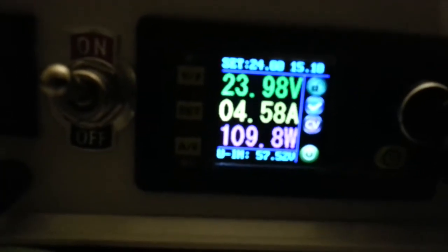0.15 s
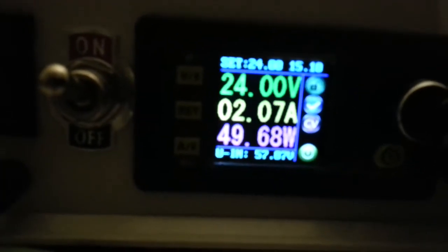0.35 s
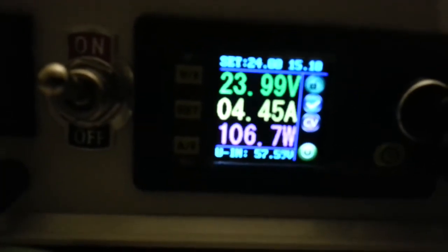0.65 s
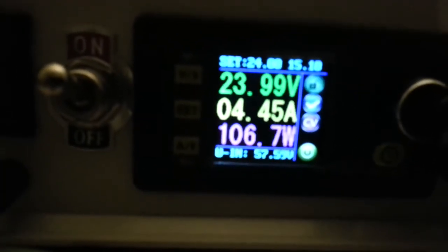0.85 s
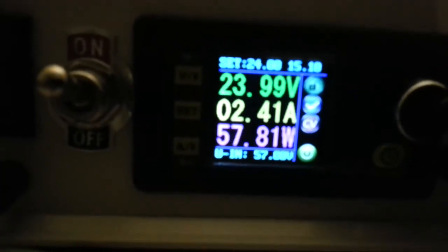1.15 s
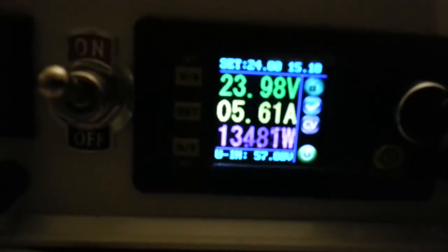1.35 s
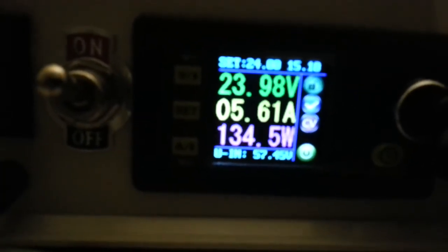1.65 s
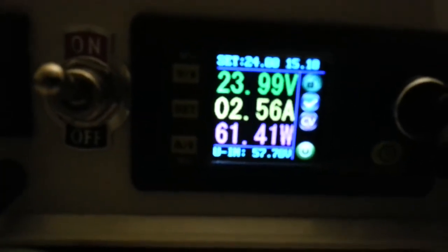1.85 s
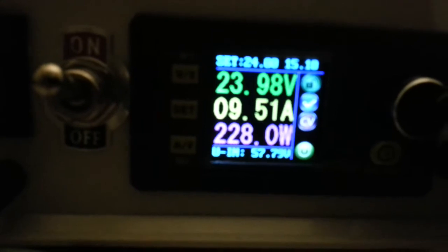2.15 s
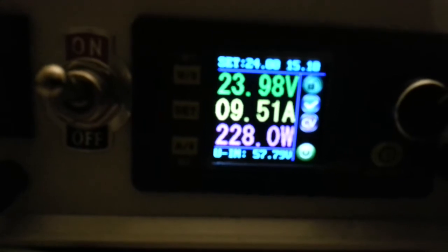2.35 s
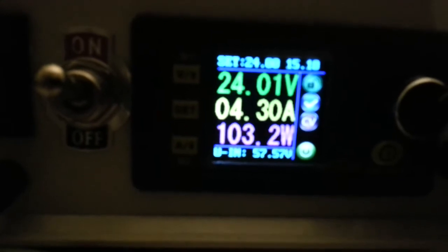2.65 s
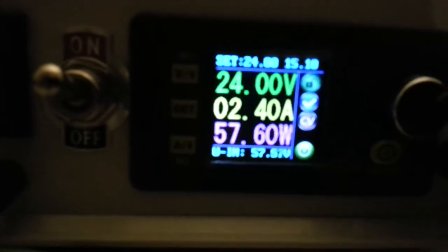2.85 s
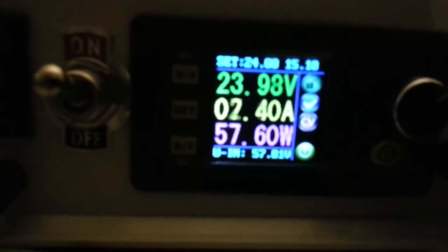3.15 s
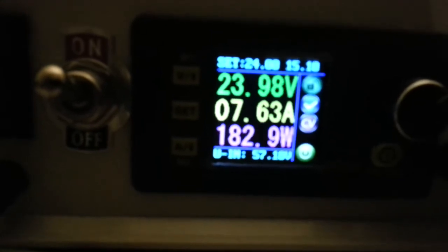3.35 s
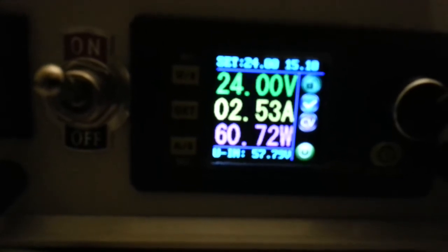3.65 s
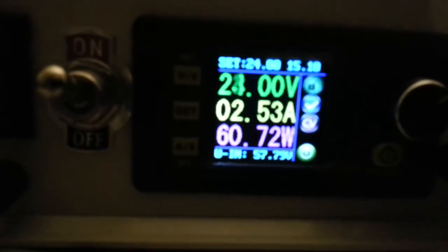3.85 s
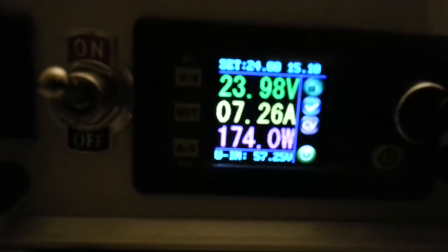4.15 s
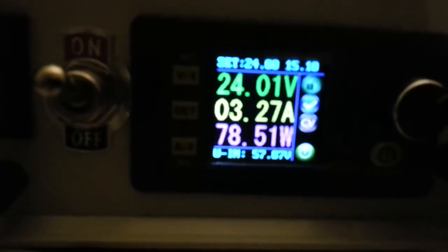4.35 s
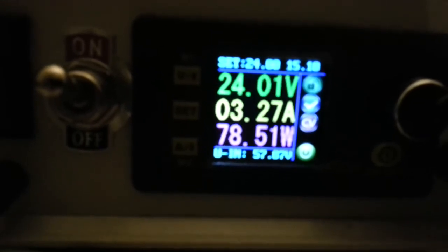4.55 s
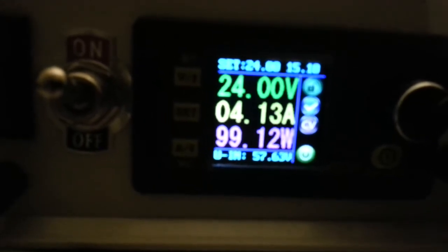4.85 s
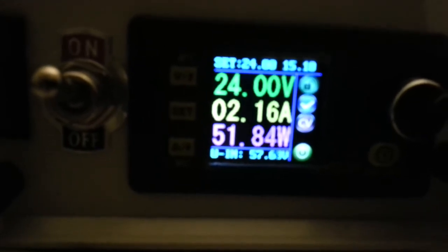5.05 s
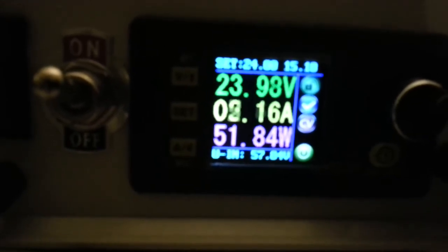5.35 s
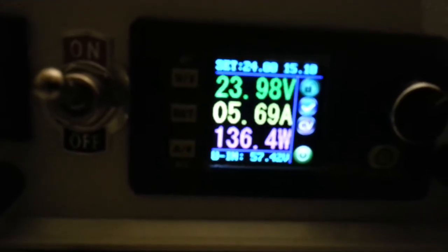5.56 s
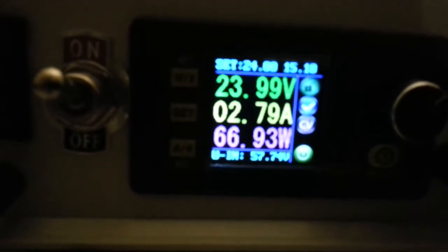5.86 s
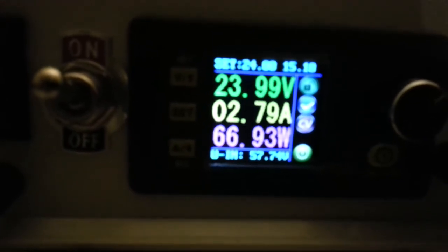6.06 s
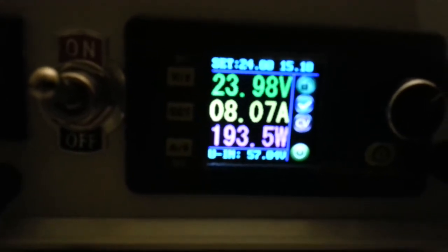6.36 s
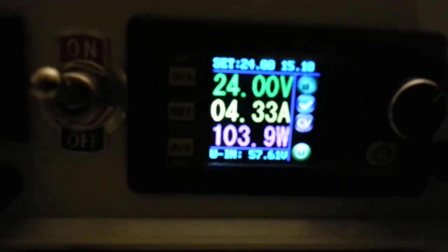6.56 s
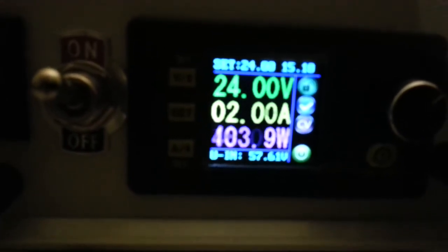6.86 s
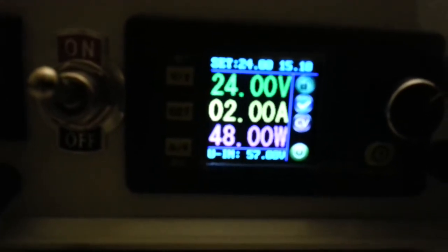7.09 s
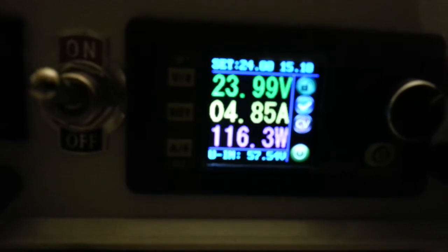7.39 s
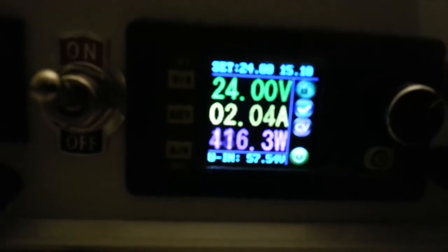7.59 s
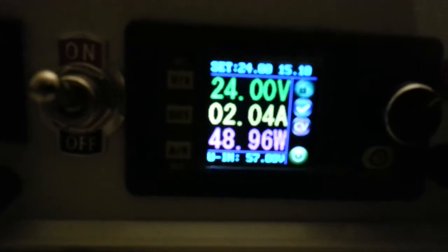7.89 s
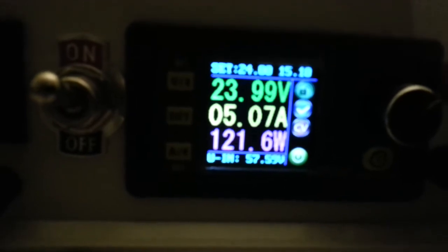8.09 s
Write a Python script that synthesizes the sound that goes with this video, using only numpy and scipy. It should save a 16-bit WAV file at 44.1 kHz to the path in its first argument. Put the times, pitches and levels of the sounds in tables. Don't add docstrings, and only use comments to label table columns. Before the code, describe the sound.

A small electric arc hisses and fizzes, snapping and restriking with sharp loud pops and brief high squeals over a faint fan in a small room.

```python
import sys
import numpy as np
from scipy import signal
from scipy.fft import rfft, irfft, next_fast_len
from scipy.io import wavfile
from scipy.ndimage import uniform_filter1d

SR = 44100
rng = np.random.default_rng(int(sys.argv[2]) if len(sys.argv) > 2 else 0)


def undo_db(level):
    steps = np.asarray(level, float) / 20
    return 10 ** steps


def output_pcm(signal):
    pcm = np.clip(np.atleast_2d(signal).T, -1, 1) * 32767
    wavfile.write(sys.argv[1], SR, np.round(pcm).astype(np.int16))


N = 362797

IDLE_DB = -68
LOW_HZ = 289

# (restrike time [s], roar length [ms], roar level [dB], sweep level [dB], thud peak [dB])
TEAR_EVENTS = [(0.127, 9, -16.5, -15.5, -5), (0.7971, 8.4, -14.5, -21, -6.5),
               (1.496, 7.2, -15.5, -19.5, -4), (2.0164, 12.5, -17, -16, -6.5),
               (2.5115, 11.4, -12.5, -17, -14.5), (2.6337, 15.8, -18, -17, -6.5),
               (3.3712, 29.7, -20, -16.5, -5), (4.184, 33.5, -21, -19, -5.5), (4.8629, 8.1, -14.5, -21, -7),
               (5.5008, 16.8, -23, -15.5, -5), (6.0721, 18, -14.5, -47, -7.5),
               (6.7449, 9.2, -20, -17.5, -2), (7.486, 4.2, -17.5, -20.5, -8.5),
               (8.096, 4.7, -24, -13.5, -7.5)]


def colour(x, table):
    size = next_fast_len(x.shape[-1])
    hz, db = np.transpose(table)
    f = np.arange(size // 2 + 1) * SR / size
    gain = undo_db(np.interp(np.log(f + 1), np.log(hz + 1), db))
    return irfft(rfft(x, size) * gain, size)[..., :x.shape[-1]]


def unit(x):
    return x / np.sqrt(np.mean(x ** 2))


def walk(rate, count=N):
    hold = max(int(SR / rate), 1)
    steps = np.repeat(rng.standard_normal(N // hold + 1), hold)
    return uniform_filter1d(uniform_filter1d(steps, hold), hold)[:count]


def band(x, hz, order=2):
    edges = [hz / 2.89, min(hz * 1.98, SR / 2.2)]
    return signal.sosfilt(signal.butter(order, edges, "band", fs=SR, output="sos"), x)


def highpass(x, hz, order=2):
    return signal.sosfilt(signal.butter(order, hz, "high", fs=SR, output="sos"), x)


def ring(modes):
    t = np.arange(SR // 40) / SR
    return -sum(undo_db(db) * np.sin(2 * np.pi * hz * t) * 1000. ** (-t / t60) for hz, db, t60 in modes)


def strikes(s, db, shape):
    train = np.zeros(N)
    train[(s * SR).astype(int)] = undo_db(db)
    return signal.oaconvolve(train, shape / np.abs(shape).max())[:N]


def hiss_db(t):
    # (start [s], end [s], start level [dB], end level [dB])
    stretches = [(0, 0.354, -57.5, -53.5), (0.379, 0.526, -45.5, -38.5), (0.527, 0.749, -45.5, -38.5),
                 (1.615, 1.74, -58.5, -47), (1.735, 1.99, -51, -43.5), (2.1, 2.342, -56, -40.5),
                 (2.366, 2.517, -33.5, -25.5), (2.522, 2.621, -33.5, -22), (2.67, 2.84, -38.5, -33),
                 (2.838, 3.091, -33.5, -29.5), (3.113, 3.229, -25.5, -30.5), (3.249, 3.31, -31.5, -23),
                 (3.398, 3.574, -39.5, -34.5), (3.57, 3.63, -32.5, -36), (3.68, 3.776, -54, -44),
                 (3.778, 3.96, -43.5, -51), (3.965, 4.03, -49, -40.5), (4.2, 4.604, -40, -36.5),
                 (4.595, 4.69, -32, -55), (4.714, 4.85, -45, -57), (5.017, 5.753, -49, -56.5),
                 (5.109, 5.106, -40, -37), (5.76, 5.853, -43.5, -43.5), (5.86, 5.96, -48.5, -56.5),
                 (5.98, 6.061, -42, -41), (6.15, 6.237, -44, -53), (6.444, 6.649, -58, -44),
                 (7.356, 7.463, -56, -56), (7.68, 7.895, -61.5, -49), (7.893, 8.042, -51.5, -48)]
    light_db_per_s, quench_db_per_s = 800, 1100
    each = []
    for start, end, start_db, end_db in stretches:
        drift = np.interp(t, [start, end], [start_db, end_db])
        unlit = light_db_per_s * np.maximum(start - t, 0)
        quenched = quench_db_per_s * np.maximum(t - end, 0)
        each.append(drift - unlit - quenched)
    return np.maximum(np.max(each, axis=0), IDLE_DB)


def fan():
    # (frequency [Hz], level [dB])
    air_colour = [(15, -60), (25, -50), (106, -18), (154, -15), (186, -7.5), (271, -12), (501, -15),
                  (691, -12.5), (856, -14), (1180, -19.5), (1670, -17), (1910, -18.5), (15000, -27)]
    # (frequency [Hz], level [dB])
    hum_lines = [(188.4, -62.5)]
    air_db, load_db = -52, 2
    t = np.arange(N) / SR
    flutter_db = 1.5 * walk(8)
    alike = colour(rng.standard_normal(N), [(150, -12.5), (500, -14), (1500, -19)])
    air = unit(colour(3.65 * alike + rng.standard_normal((2, N)), air_colour)) * undo_db(air_db + flutter_db)
    load = uniform_filter1d(np.clip((hiss_db(t) - IDLE_DB) / 14, 0, 1), size=4000)
    hum = sum(undo_db(db + 6 + 1.1 * walk(2.0)) * np.sin(2 * np.pi * hz * t + 1.0 * walk(4.3))
              for hz, db in hum_lines)
    return air * undo_db(load_db * load) + hum


def rumble():
    swell = np.interp(np.arange(N) / SR, [8.02, 8.16], [0, 1])
    dull = colour(rng.standard_normal(N), [(130, -13), (230, 2), (300, -1), (480, -10), (1000, -41.5)])
    return unit(dull) * swell * undo_db(-45.5 + 2.9 * walk(40))


def knocks():
    # (time [s], peak level [dB])
    taps = [(1.119, -31), (1.754, -25.5), (2.302, -23.5), (4.8123, -24), (5.7985, -32), (6.367, -29.5),
            (7.0732, -31), (7.34, -23.5), (7.3866, -20), (7.869, -31), (8.008, -29)]
    # (frequency [Hz], level [dB], time to fade by 60 dB [s])
    wood_modes = [(436, -5, 0.04), (786, 15, 0.011), (1530, 16, 0.0024)]
    s, db = np.transpose(taps)
    return strikes(s, db - 7.5, np.convolve(ring(wood_modes), np.hanning(15)))


def sparks(scatter_db, flicker_db, rate):
    size = np.minimum(rng.exponential(size=N), 5)
    discharges = np.clip(rng.standard_normal(N), -3, 3) * undo_db(scatter_db * size)
    return discharges * undo_db(flicker_db * walk(rate))


def hiss():
    # (time [s], depth [dB])
    sputter = [(0, 2), (2.3, 1.5), (3.6, 1.5), (3.8, 3), (4.35, 4), (4.42, 7), (4.72, 8), (4.8, 2),
               (5.0, 4), (5.9, 4), (6.6, 3), (8.2, 2)]
    # (frequency [Hz], level [dB])
    resonances = [(3800, -25.5), (4900, 0), (6000, 1.5), (7600, 7)]
    treble_db, treble_per_db = -12, -0.11
    t = np.arange(N) / SR
    db = hiss_db(t)
    depth_db = np.interp(t, *np.transpose(sputter))
    spurts = undo_db(depth_db * (np.tanh(3 * walk(90)) - .5))
    fizz = sparks(2.5, 2.2, 400) * spurts
    body = np.zeros(N)
    for hz, gain_db in resonances:
        hump = [(hz * 0.22, -60), (hz * 0.81, 0), (hz * 1.036, 0), (hz * 1.22, -30)]
        body += colour(fizz, hump) * undo_db(gain_db + 4.16 * walk(9.3))
    treble = unit(colour(fizz, [(6500, -30), (9500, 14), (11500, 8.5), (14000, 1.5)])) * undo_db(4 * walk(14))
    return undo_db(db + 2.0) * (unit(body) + undo_db(treble_db + treble_per_db * (db + 44.5)) * treble)


def squeal():
    # (start [s], end [s], pitch [Hz], start level [dB], end level [dB])
    runs = [
        (0.067, 0.107, 6400, -61, -39),
        (1.963, 1.987, 6030, -47, -37),
        (3.249, 3.32, 6155, -44.5, -16.5),
        (4.03, 4.143, 6065, -22, -24),
        (7.367, 7.445, 6930, -63, -52),
    ]
    # (time [s], pitch [Hz], peak level [dB], swell [ms])
    chirps = [(.049, 6420, -26, 0.62), (0.066, 6210, -16, 1), (0.1165, 6120, -3.5, 4), (.12, 6550, 4, 0.35),
              (0.735, 6350, -5, 2.75), (0.745, 6340, -1.5, 2.2), (.749, 6240, -12.5, 3.1),
              (0.7536, 6450, -7, 1.4), (0.754, 6440, -5, 1.4), (0.762, 6480, -14.5, 2.5),
              (0.7772, 6425, -1, 5.6), (.7852, 6280, -3.5, 5.7), (0.7894, 6630, -12, .8),
              (.7954, 6980, -3, 1.4), (1.491, 6390, -13.5, 2), (1.9539, 5860, -5, 1.7),
              (1.9959, 6040, -3, 0.9), (1.9984, 6010, -4.5, 1.3), (4.154, 5810, -4.5, 1.67),
              (4.1594, 5920, -15.5, 2.5), (4.1627, 6290, -4, 1.76), (4.8566, 6600, -12, 2.1),
              (6.061, 6470, -5, 2.2), (6.0682, 6450, -7, 2.4), (6.702, 6300, -20, 1.92),
              (6.736, 6330, -6, 1.6), (6.7412, 6270, -2, 0.76), (7.4804, 6380, -8.5, .9)]
    hz_now, size = np.full(N, 6200.), np.zeros(N)
    waver, stutter = walk(900), walk(420)
    for start, end, hz, start_db, end_db in runs:
        i = np.arange(int(start * SR), int(end * SR))
        hz_now[i] = hz * (1 + 0.0493 * waver[i])
        level = undo_db(np.interp(i / SR, [start, end], [start_db, end_db]) + 7.5)
        size[i] = level * np.abs(1 + 0.27 * stutter[i])
    for s, hz, db, swell_ms in chirps:
        fade_ms = .75 * swell_ms
        ms = np.arange(-6 * swell_ms, 4 * fade_ms, 1000 / SR)
        i = int(s * SR + ms[0] * SR / 1000) + np.arange(len(ms))
        away = np.abs(ms / np.where(ms < 0, swell_ms, fade_ms))
        blob = undo_db(db - 8.0 - 4.75 * away ** np.where(ms < 0, 1.2, 1.8))
        hz_now[i] = np.where(blob > size[i], hz * (1 + 0.018 * waver[i]), hz_now[i])
        size[i] = np.maximum(size[i], blob)
    phase = 2 * np.pi * np.cumsum(hz_now) / SR
    return uniform_filter1d(size, size=9) * (np.sin(phase) + undo_db(-29.0) * np.sin(2 * phase))


def tears():
    # (end time [s], roar length [ms], roar level [dB], sweep level [dB])
    flares = [
        (0.7815, 12, -16.5, -60),
        (.7893, 6.8, -20, -30),
        (2.0052, 6.8, -13, -41),
        (3.135, 26, -36, -50),
        (3.321, 24, -21, -50),
        (3.3401, 22, -18.5, -28),
        (4.1255, 99, -18, -50),
    ]
    # (frequency [Hz], level [dB])
    roar_colour = [(320, -26), (550, -14), (1810, -10), (2350, -7), (5100, -1), (5780, -14.5), (6910, 2.5),
                   (9240, -1.5), (12400, -5), (15000, -3.5)]
    rise_ms, sweep_hz = .7, 8400
    out, waver = np.zeros(N), walk(1500)
    roar = unit(colour(sparks(2.88, 5.3, 600), roar_colour))
    for end, length_ms, db, sweep_db, *_ in TEAR_EVENTS + flares:
        s = end - length_ms / 1000
        i = np.arange(int(s * SR - 8 * rise_ms * SR / 1000), int(end * SR))
        ms = (i / SR - s) * 1000
        gone = np.clip(ms / length_ms, 0, 1) ** 0.91
        up_hz = (sweep_hz + (14000 - sweep_hz) * gone) * (1 + 0.09 * waver[i])
        down_hz = (6200 - 2800 * gone) * (1 + 0.2 * waver[i])
        climbing = np.sin(2 * np.pi * np.cumsum(up_hz) / SR)
        sinking = 0.67 * np.sin(2 * np.pi * np.cumsum(down_hz) / SR)
        swell = np.exp(np.minimum(ms / rise_ms, 0))
        out[i] += swell * (undo_db(db) * roar[i] + undo_db(sweep_db) * (climbing + sinking))
    return out


def pops():
    # (time [s], thud peak [dB], crack peak [dB])
    snaps = [(.654, -13, 4.5), (0.7328, -22, 2.5), (.743, -25, 5.5), (0.7723, -21, -6), (1.4207, -14, 2.5),
             (1.9541, -18.5, 4), (2.5932, -24.5, 5), (2.9465, -52, -34), (3.1354, -20.5, 8),
             (3.3181, -26.5, -3), (3.331, -20.5, 3), (3.872, -38, -30), (4.033, -15.5, 11),
             (4.16, -13.5, -19), (4.283, -25, -15), (4.287, -31, -19), (4.343, -33, -8),
             (4.402, -34.5, -4.5), (4.472, -33, -20), (4.49, -31, -28), (4.731, -15.5, 2.5),
             (4.7877, -34, -6), (5.1032, -37, -26), (5.425, -15, 3), (5.4863, -10.5, 3),
             (6.623, -32.5, -21), (6.6596, -17, 0), (6.6747, -19.5, -1), (7.2973, -22.5, -4)]
    # (time [s], crack peak [dB])
    ticks = [(.048, -18), (.0646, -18), (0.7416, -1), (1.4024, -12.5), (2.2071, -20), (3.1076, -19),
             (3.637, -28), (3.776, -27), (3.7982, -14), (3.9262, -25), (3.985, -13), (4.4068, -15),
             (4.4628, -18), (4.4928, -22), (4.5203, -9), (4.5468, -13), (4.5888, -11), (4.6318, -25),
             (4.6595, -24), (4.7066, -6.5), (4.7264, 0), (5.0997, -14), (5.1528, -9.5), (5.274, -11.5),
             (5.381, -21), (5.7575, -19), (5.8583, -21), (5.976, -23), (6.6413, -13), (7.985, -17)]
    # (frequency [Hz], level [dB], time to fade by 60 dB [s])
    thud_modes = [(745, -4, 0.012), (1683, 1.5, 0.0036), (2455, 8.5, 0.0022), (3360, 1, 0.003)]
    # (frequency [Hz], level [dB], time to fade by 60 dB [s])
    crack_modes = [(4800, -2, .003), (6300, 0, .0035), (8200, -3, .0025), (11500, -10, .002)]
    restrike_crack_db, tick_thud_db = 3, -33.5
    restrikes = [(s, db, restrike_crack_db) for s, *_, db in TEAR_EVENTS]
    thin = [(s, db + tick_thud_db, db) for s, db in ticks]
    s, thud_db, crack_db = np.transpose(restrikes + snaps + thin)
    thud = np.convolve(ring(thud_modes), np.hanning(7))
    crack = highpass(np.convolve(ring(crack_modes), np.hanning(5)), 4460, order=4)
    return strikes(s, thud_db + 1.5, thud) + strikes(s, crack_db - 11.5, crack)


def room():
    # (frequency [Hz], time to fade by 60 dB [s], level [dB])
    tail_bands = [(452, 0.26, -9), (1436, 0.23, -9), (2740, 0.29, -13.5), (6800, 0.23, -10.5),
                  (12880, 0.22, -15)]
    bench_db, wall_db, wall_s = -11, -24, 0.01164
    t = np.arange(SR // 2) / SR
    onset = np.clip(t / 0.0011, 0, 1) ** 2
    tail = sum(undo_db(db) * band(rng.standard_normal((2, len(t))), hz) * 1000. ** (-t / t60)
               for hz, t60, db in tail_bands)
    bench = undo_db(bench_db) * np.exp(-t / .0009) * (t > .0002)
    wall = undo_db(wall_db) * np.exp(-((t - wall_s) / 0.00099) ** 2)
    return onset * tail / 18 + (bench + wall) * rng.standard_normal((2, len(t))) / 5


def echoes(arc, tone):
    share = np.array([walk(260) for _ in range(3)])
    sends = arc * share / np.sqrt(np.sum(share ** 2, axis=0))
    sends[0] += tone
    heard = sum(signal.oaconvolve(x[None], room(), axes=1)[:, :N] for x in sends)
    return highpass(heard, LOW_HZ)


def scene():
    # (frequency [Hz], level [dB])
    shadow = [(200, -4), (1000, -4), (2400, -4), (4400, -8.5), (6200, -9.5), (8000, -9), (14000, -7)]
    port_lag = 16
    noisy = highpass(hiss() + tears() + pops() + knocks(), LOW_HZ)
    tone = squeal()
    left, right = echoes(noisy, tone)
    left = np.roll(undo_db(-0.5) * left + colour(noisy + tone, shadow), port_lag)
    right = right + noisy + tone
    return undo_db(4.0) * np.array([left, right]) + fan() + rumble()


def mask(x):
    # (frequency [Hz], level [dB])
    floor = [(60, -46), (150, -38), (500, -40), (1200, -35), (1800, -36), (2600, -42), (4000, -45),
             (15000, -44)]
    f, _, z = signal.stft(x, SR, "cosine", nperseg=2048, noverlap=1024)
    which = np.digitize(f, np.geomspace(60, 16000, num=44))
    _, first, member = np.unique(which, return_index=True, return_inverse=True)
    power = np.add.reduceat(np.abs(z) ** 2, first, axis=1)
    limit = undo_db(2 * np.interp(f[first], *np.transpose(floor)))[:, None]
    keep = power > limit * power.sum(axis=1, keepdims=True)
    return signal.istft(z * keep[:, member], SR, "cosine", nperseg=2048, noverlap=1024)[1][:, :N]


def roll_off(x):
    return signal.sosfilt(signal.butter(12, 15460, fs=SR, output="sos"), x)


def record(dry):
    top_cut = signal.ellip(8, .2, 60, 14600, fs=SR, output="sos")
    finished = signal.sosfilt(top_cut, mask(np.clip(dry, -1, 1)))
    return roll_off(np.clip(finished, -1, 1))


dry = scene()
out = record(dry)
output_pcm(out)
```